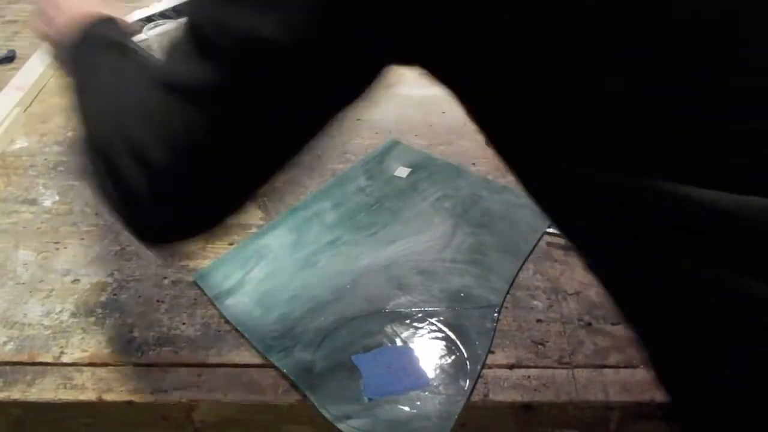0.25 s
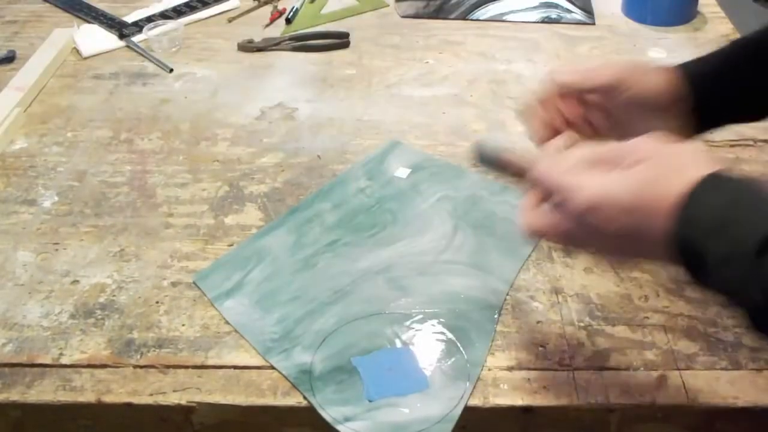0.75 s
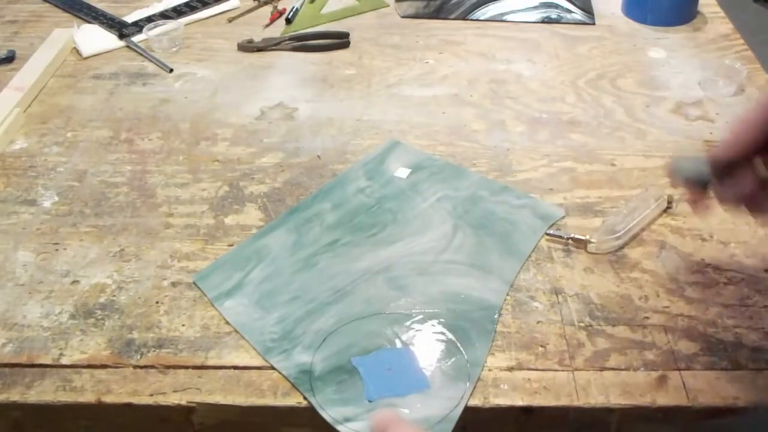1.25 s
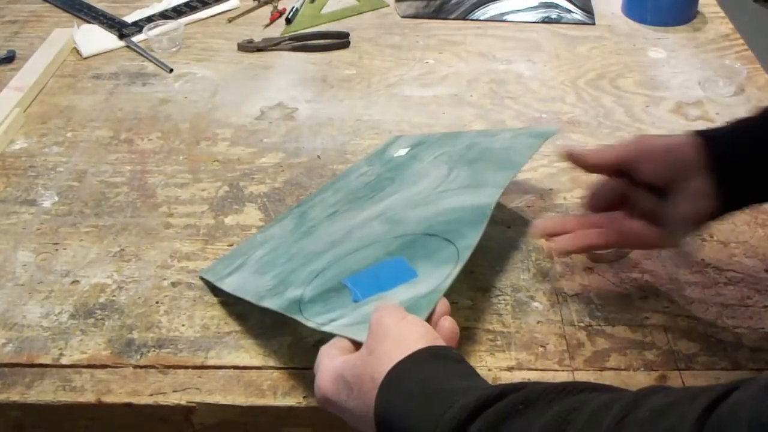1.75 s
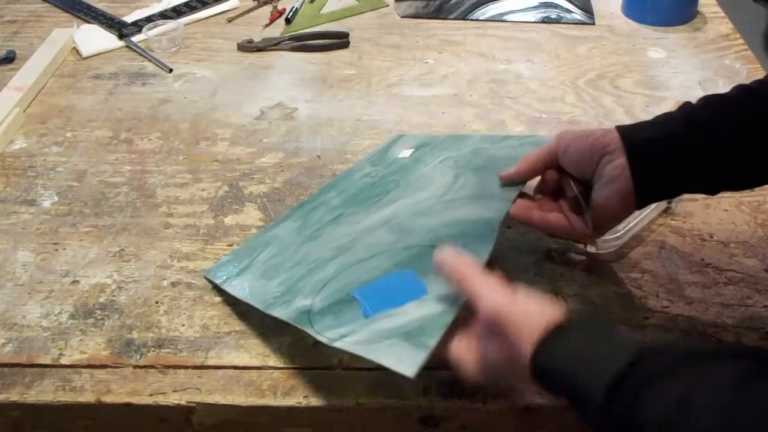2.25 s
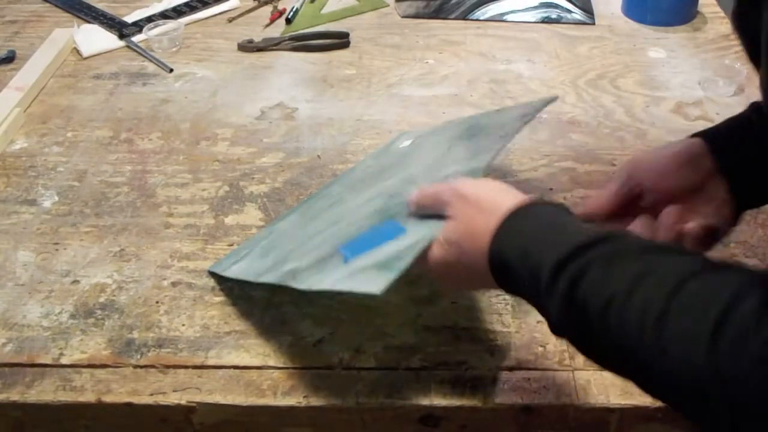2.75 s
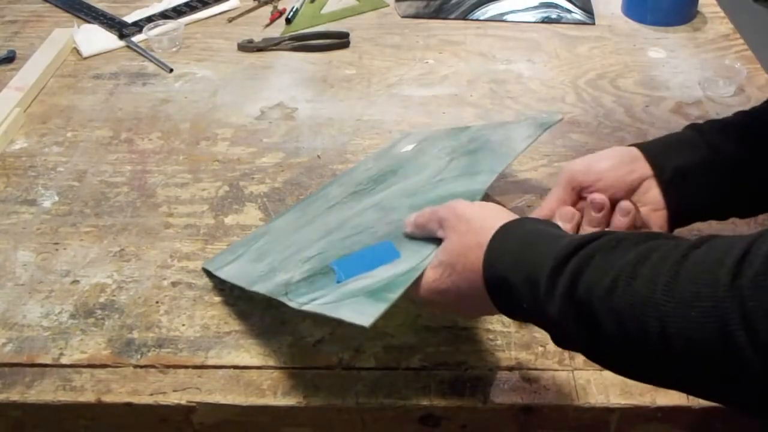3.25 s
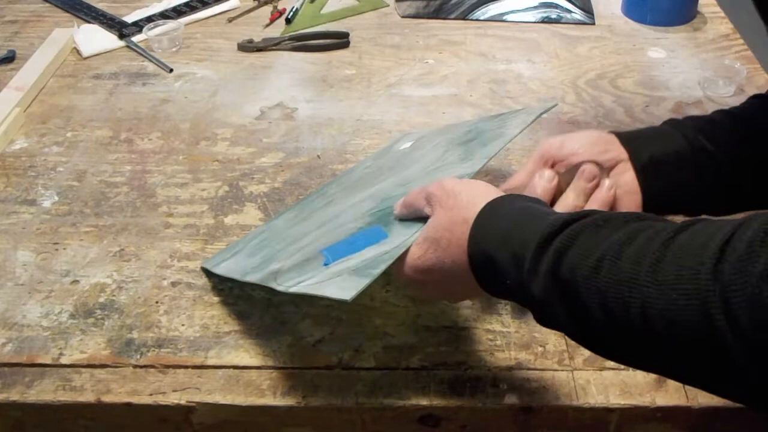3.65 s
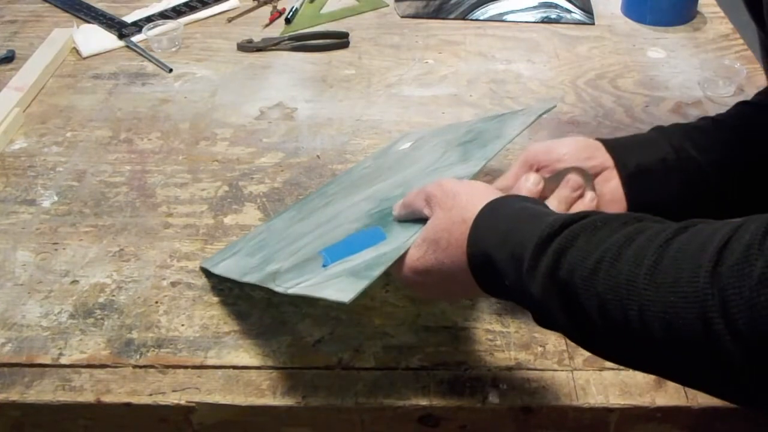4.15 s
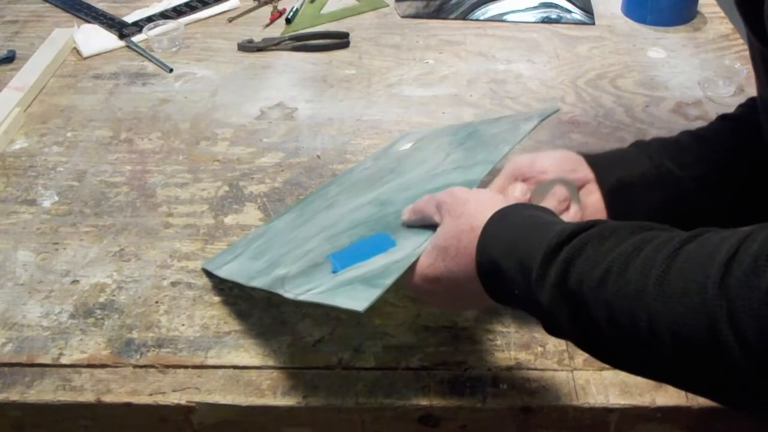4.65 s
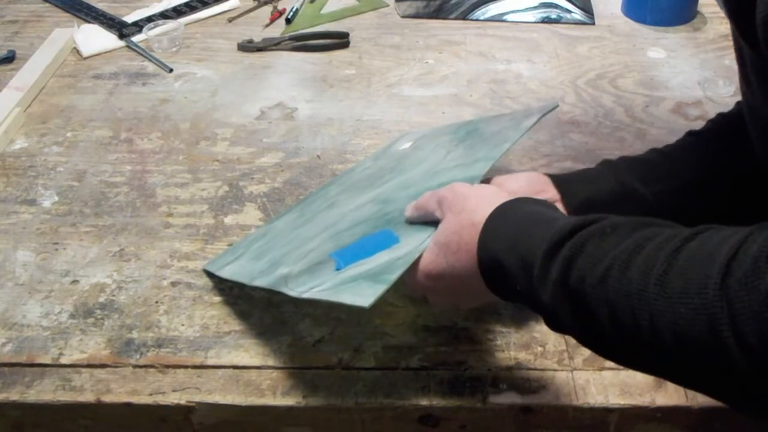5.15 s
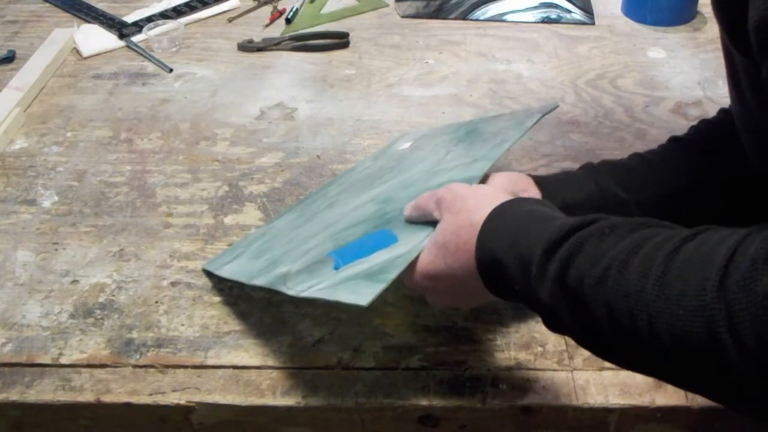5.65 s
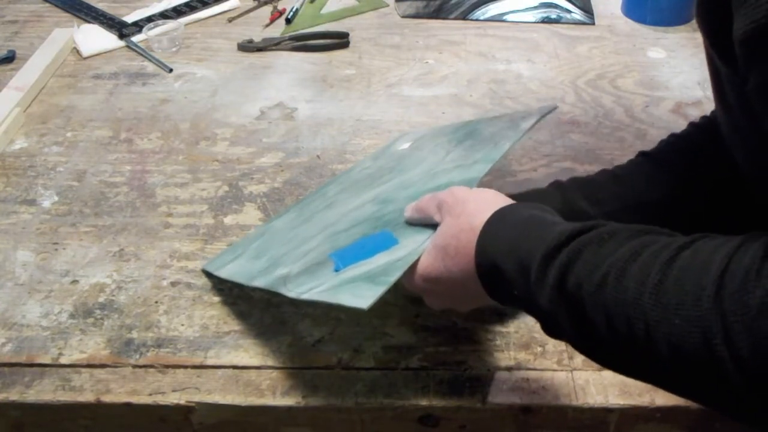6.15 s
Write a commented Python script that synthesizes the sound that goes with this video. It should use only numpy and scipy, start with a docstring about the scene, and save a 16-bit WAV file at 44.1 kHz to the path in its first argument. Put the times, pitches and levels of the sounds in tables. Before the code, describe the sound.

In a live workshop, sleeves rustle and a glass sheet clinks and scrapes on wood, then sharp metal taps crack steadily against it.

```python
"""Metal taps on a scored sheet of stained glass, about five a second: cracks, rebounds, detuned modes.
Before them the sheet is lifted on a wooden workbench: sleeves rustle (grainy noise), the cutter clicks
(damped modes), the sheet clinks (bursts plus modes), its edge drags (stick-slip ticks) and squeaks (tones).
A live workshop adds echoes and a diffuse tail, over air noise, thin crackles and a ticking buzz.
Each tap overloads the camera; its limiter ducks, then lets the room ring swell back."""
import sys
import numpy as np
from scipy import signal
from scipy.fft import rfft, irfft
from scipy.io import wavfile
from scipy.ndimage import uniform_filter1d, minimum_filter1d

SR = 44100
rng = np.random.default_rng(int(sys.argv[2]) if len(sys.argv) > 2 else 0)


def materialize(psi):
    """Save the field psi as 16-bit PCM at rate SR to the path in sys.argv[1].

    A 1-D psi becomes a single channel; in a 2-D psi each row is a channel.
    """
    bounded = np.clip(np.atleast_2d(psi).T, -1, 1)
    quanta = np.round(bounded * 32767).astype(np.int16)
    wavfile.write(sys.argv[1], SR, quanta)


N = 281799

# Table levels are relative; each source sets its own overall level.
# taps under the score: [t/s, force/dB]
TAPS = [(3.5357, -5), (3.782, -2.5), (3.996, -4), (4.199, -2.5), (4.417, -1.5), (4.6243, -1.8), (4.834, -3),
        (5.057, -7), (5.2422, -5), (5.4433, -7), (5.6433, -6), (5.851, -7), (6.057, -5.5), (6.2445, -6.5),
        (6.3728, -11)]
# sheet knocks on the bench: [t/s, level/dB, brightness/dB]
KNOCKS = [(.441, -26, -9), (1.442, -39.5, 2.5), (1.74, -33, -18), (1.969, -42, 4), (1.9898, -3, -2.5),
          (2.093, -10, -38), (2.151, -12, -27)]
# cutter clicks in the hand: [t/s, level/dB]
CLICKS = [(0.9173, -1), (0.9182, -4), (0.936, -5.5)]
# edge drags over the wood: [t/s, length/s, level/dB, brightness/dB, squeak strength/0-1]
DRAGS = [(0.445, 0.027, -10.5, 11, 0.73), (1.265, 0.069, -18.5, 5.5, 0.15), (1.44, 0.042, -19, 17.5, 0.38),
         (1.542, 0.062, -6.5, -1.5, 0.06), (2.186, 0.022, 0.5, -32, 0.5), (2.262, 0.044, 1, 3, 0.97),
         (2.328, 0.022, -3.5, 3.5, .8), (2.368, 0.061, -0.5, -5, 0), (2.426, 0.049, -3, -8, 0.5),
         (2.51, 0.03, -5.5, -8, 0.6), (2.801, 0.058, -14.5, -3, 0.08), (3.272, 0.054, -18.5, 4.5, 0.08)]
# arm movements that rustle the sleeves: [t of fastest/s, length/s, level/dB, brightness/dB]
SLEEVES = [(.01, 0.13, -55.5, -37), (0.355, 0.39, -63, 0.5), (0.614, 0.28, -57, 4), (0.824, 0.6, -59, 5.5),
           (1.58, 0.45, -59.5, 2), (1.752, 1, -66, 0.5), (2.383, 0.77, -59.5, 2), (2.918, 0.99, -66.5, 4)]
# thin crackles between the taps: [t/s, level/dB]
CRACKLES = [(3.8929, -0.5), (4.0905, -2), (4.5025, 12), (4.7005, 5), (4.9105, -4)]
# sheet modes, nominal: [f/Hz, tapped level/dB, knocked level/dB, dragged level/dB, free t60/s]
GLASS_MODES = [(555.4, -28, 0, -0.5, 0.3), (790, -7.5, -32, -29, 0.46), (884, 2, -46, -15, 0.19),
               (1090, -5.5, -51, -30, 0.31), (1191, -5, -3, -23, 0.44), (1520, 5, -45, -10, 0.21),
               (1619, -6.5, 11, -18, 0.18), (1663, 4.5, -21, -24, 0.24), (1810, -30, -17, -46, 0.077),
               (1858, -5, 9, -21, 0.13), (2033, 3, -23, -10, 0.38), (2700, -31, 22, 6, 0.12),
               (3287, 5, -32, -7, 0.23), (3377, 13.5, 16, -5, 0.07), (3357, 3.5, -38, -3, 0.13),
               (3340, 9, -41, -27, 0.031), (3670, 3, -27, -17, 0.37), (3950, 12.5, 0, -9, 0.09),
               (3820, 0, -34, -4, 0.063), (4144, -3.5, -50, -7, 0.43), (4295, 3, -34, -22, 0.23),
               (5060, -1, -10, -12, 0.28), (5389, -3.5, -46, -43, 0.37), (5450, -2, 7, -2, 0.094)]
# cutter modes: [f/Hz, level/dB, undamped t60/s]
CUTTER_MODES = [(3820, -4, 0.035), (4150, 2, 0.019), (4460, 0, 0.012), (4940, -14, 0.019), (6400, -15, .01),
                (8500, -18, .07)]
# spectrum of a tap's crack: [f/Hz, density/dB per Hz]
TAP_TONE = [(40, -22), (110, -19), (200, -18.5), (320, -16), (500, -2), (850, 2), (1700, 2.5), (3300, 4.5),
            (4200, 3.5), (5300, -2.5), (6600, -6), (7600, -13), (10000, -23.5), (15000, -58)]
# spectrum of a knock: [f/Hz, density/dB per Hz]
KNOCK_TONE = [(40, -47), (170, -39), (300, -16), (500, 11), (1100, 13.5), (1400, 8.5), (1680, 16.5),
              (2100, 15), (3300, 10.5), (5600, -2), (7400, -12), (10000, -34), (14500, -21)]
# spectrum of a drag: [f/Hz, density/dB per Hz]
DRAG_TONE = [(40, -23), (170, 0.5), (500, 1), (900, 3.5), (1800, -2), (3500, 1), (6500, -9.5), (9000, -34),
             (15000, -64)]
# spectrum of rubbing cloth: [f/Hz, density/dB per Hz]
CLOTH_TONE = [(40, -37), (170, -5), (400, -5.5), (800, 1.5), (1600, 0), (3500, -5.5), (5000, -7),
              (6800, -5.5), (9000, -21.5), (15000, -24)]
# spectrum of air and hiss: [f/Hz, density/dB per Hz]
AIR_TONE = [(30, 10), (120, -10), (250, -3.5), (500, 5.5), (900, 6), (1600, 4.5), (3300, -1.5), (4800, 4),
            (7000, -8.5), (8800, -10.5), (11000, -1), (15500, -1.5)]
# decay of the workshop: [f/Hz, t60/s]
ROOM_DECAY = [(150, 0.35), (500, 0.78), (1500, 0.71), (3500, 0.6), (6500, 0.53), (12000, 0.24)]
# nearby surfaces: [delay/s, left level/dB, right level/dB]
ECHOES = [(.0021, -27, -18.5), (.0063, -7, -11.5), (.0087, -12.5, -6), (0.0174, -5, -8)]
# left-right likeness of the room sound: [f/Hz, likeness/0-1]
LIKENESS = [(60, 0.9), (290, 0.99), (640, 0.97), (1410, 0.96), (3100, 0.88), (6800, 0.33), (15000, 0.34)]
# balance of the two microphone ports: [f/Hz, left minus right/dB]
PORT_BALANCE = [(60, 3), (130, 0.5), (290, -0.5), (640, -1), (1410, -0.5), (3100, -2.5), (6820, 0.5),
                (15000, 2.5)]
# dips in the microphone's response: [f/Hz, width/Hz, depth/dB]
NOTCHES = [(2473, 277, 23.5), (8084, 286, 14.5)]

HZ = np.fft.rfftfreq(8192, 1 / SR)
RING_T_S = np.arange(SR // 2) / SR
EDGE_HZ = 16200
BUZZ_DB, BUZZ_HZ = -43, 58.8
# first to last tap: the sheet answers fuller and brighter towards the end of the score
LOWS_START_DB, LOWS_END_DB = -7, 4.5
BRIGHT_START_DB, BRIGHT_END_DB = -1.5, 5.5
TRAVEL_POWER = 1.4
# the cutter touches the glass again after each tap; spread is log-normal
REBOUND_S, REBOUND_SPREAD, REBOUND_DB = .0032, 0.41, -13.5
CONTACT_HZ, CONTACT_SPREAD, CONTACT_T60_S = 4944, 0.045, .022
SQUEAK_HZ = 1530
SPEED_UP_SHARE = 0.68  # of a movement's length; the rest is slowing down
RESTING_DB = -78  # cloth never quite still; before the sleeve level
# gaps shrink and levels drop from bounce to bounce
BOUNCE_S, BOUNCE_SHRINK, BOUNCE_DB = .014, .8, -9


def amp(db):
    """Decibels to gain."""
    return 10 ** (np.asarray(db) / 20)


def unit(x):
    """Scales to rms 1."""
    return x / np.sqrt(np.mean(x ** 2) + 1e-20)


def read(points, hz=HZ):
    """Interpolates a table over log frequency."""
    f, value = np.transpose(points)
    return np.interp(np.log(hz + 1), np.log(f), value)


def shelf(corner_hz):
    """Weight rising from 0 below the corner to 1 above it."""
    return HZ ** 4 / (HZ ** 4 + corner_hz ** 4)


def add(mix, start_s, sound):
    """Adds a sound into the mix in place."""
    part = mix[round(start_s * SR):][:len(sound)]
    part += sound[:len(part)]


def causal(db):
    """Minimum-phase impulse response of a dB spectrum."""
    log_gain = np.log(amp(np.r_[db, db[-2:0:-1]]))
    spectrum = np.exp(np.conj(signal.hilbert(log_gain)))
    return np.fft.ifft(spectrum).real[:len(HZ)]


def colour(x, db):
    """Filters one channel by a dB spectrum."""
    return signal.oaconvolve(x, causal(db))[:len(x)]


def ring(hz, db, t60_s):
    """Sum of exponentially decaying modes set off by one blow."""
    envelopes = amp(db[:, None] - 60 * RING_T_S / t60_s[:, None])
    return (envelopes * np.sin(2 * np.pi * hz[:, None] * RING_T_S)).sum(0)


def burst(decay_s):
    """Scattered waves: a decaying noise burst of energy 1, spectrum flattened before its final fade."""
    fade = np.exp(-RING_T_S / decay_s)
    spectrum = rfft(rng.standard_normal(len(RING_T_S)) * fade)
    x = irfft(spectrum / abs(spectrum), len(RING_T_S)) * np.sqrt(fade)
    return x / np.linalg.norm(x)


def stroke_envelope(length_s):
    """Level of one edge stroke: root of a half sine."""
    return np.sqrt(np.sin(np.pi * np.minimum(RING_T_S / length_s, 1)).clip(0))


def buzz():
    """Camera electronics leak a steady train of tiny ticks, lows cut."""
    ticks = np.diff(np.floor(BUZZ_HZ * np.arange(N) / SR), prepend=0)
    return amp(BUZZ_DB) * colour(ticks, -20 * (1 - shelf(6000)))


def air(level_db=-63.0, likeness=0.31):
    """Still room air and microphone hiss: steady noise, partly shared by the two ports."""
    shared, *own = rng.standard_normal((3, N))
    noise = np.sqrt(likeness) * shared + np.sqrt(1 - likeness) * np.array(own)
    return amp(level_db) * unit(np.array([colour(side, read(AIR_TONE)) for side in noise]))


def diffuse(count):
    """Noise from all sides at two close microphones, as short-time spectra."""
    hz, t_s, (mid, side) = signal.stft(rng.standard_normal((2, count)), SR, nperseg=256)
    same = np.clip(read(LIKENESS, hz), 0, 1)[:, None]
    mid = mid * np.sqrt((1 + same) / 2)
    side = side * np.sqrt((1 - same) / 2)
    return hz, t_s, np.array([mid + side, mid - side])


def workshop(x, near, far_top_db=-5, tail_db=0.0, build_s=0.0036, near_share=0.44,
             bench_db=-6, bench_s=0.0043, drift_hz=0.3003):
    """Direct sound, near echoes, bench scatter and a tail that changes as the hands move along."""
    out = np.array([x + near, x + near])
    x = x + near_share * near  # sounds aimed at the microphone raise less of the room
    dulled = colour(x, -10 * shelf(8700))  # surfaces swallow the top
    for delay_s, *sides_db in ECHOES:
        delayed = np.pad(dulled, (round(delay_s * SR), 0))[:N]
        out += amp(sides_db)[:, None] * delayed
    for side in out:
        scatter = signal.oaconvolve(x, burst(bench_s))[:N]
        side += amp(bench_db) * colour(scatter, -14 * (1 - shelf(2730)))
    far = colour(x, far_top_db * shelf(10400))
    turn = 2 * np.pi * drift_hz * np.arange(N) / SR
    # three tails; squared weights sum to 1
    weights = (np.cos(turn), np.sin(turn) * np.cos(turn / 2), np.sin(turn) * np.sin(turn / 2))
    for weight in weights:
        hz, t_s, z = diffuse(SR)
        z = z * amp(-60 * t_s / read(ROOM_DECAY, hz)[:, None])
        tail = signal.istft(z, SR, nperseg=256)[1][:, :SR]
        tail *= 1 - np.exp(-(np.arange(SR) / SR / build_s) ** 2)
        tail /= np.linalg.norm(tail[0])
        out += amp(tail_db) * signal.fftconvolve((far * weight)[None], tail, axes=1)[:, :N]
    return out


def ports(x):
    """Bench a little to the right: port balance per frequency, mids mostly leaning right."""
    half_db = read(PORT_BALANCE) / 2
    return np.array([colour(x[0], half_db), colour(x[1], -half_db)])


def sleeves(level_db=-3, grain_db=2.5):
    """Cloth fibres catch and let go: grainy noise swelling and dying with each arm movement."""
    t_s = np.arange(N) / SR
    low_power = high_power = amp(RESTING_DB) ** 2
    for peak_s, length_s, db, bright_db in SLEEVES:
        reach_s = length_s * np.where(t_s < peak_s, SPEED_UP_SHARE, 1 - SPEED_UP_SHARE)
        rub = amp(db) * np.exp(-2 * ((t_s - peak_s) / reach_s) ** 2)
        low_power = low_power + rub ** 2
        high_power = high_power + (amp(bright_db) * rub) ** 2
    catches = amp(grain_db * unit(uniform_filter1d(rng.standard_normal(N), size=150)))
    cloth = unit(colour(rng.standard_normal(N) * catches, read(CLOTH_TONE)))
    low = signal.sosfiltfilt(signal.butter(2, 2500, fs=SR, output="sos"), cloth)
    high = cloth - low
    return amp(level_db) * (np.sqrt(low_power) * low + np.sqrt(high_power) * high)


def crackles(level_db=-13, length_s=0.00056, low_hz=9000):
    """Thin ticks above the ring of the sheet: short bursts, lows cut."""
    out = np.zeros(N)
    for start_s, db in CRACKLES:
        add(out, start_s, amp(db) * burst(length_s))
    return amp(level_db) * colour(out, -30 * (1 - shelf(low_hz)))


def cutter(level_db=-39, rattle_s=0.0024, damping=0.86):
    """The cutter's loose head clicks as it changes hands; fingers shorten its ring."""
    out = np.zeros(N)
    hz, mode_db, t60_s = np.transpose(CUTTER_MODES)
    for start_s, db in CLICKS:
        click = signal.fftconvolve(burst(rattle_s), ring(hz, mode_db, t60_s * damping))
        add(out, start_s, amp(db) * click)
    return amp(level_db) * out


def drags(level_db=-44, modes_db=-37, slips_per_s=700, damping=0.57):
    """The edge sticks and slips on the grain; random slips ring the sheet, damped by the wood."""
    out = np.zeros(N)
    hz, _, _, dragged_db, t60_s = np.transpose(GLASS_MODES)
    body = causal(read(DRAG_TONE))
    body = np.pad(body, (0, len(RING_T_S) - len(body)))
    body += amp(modes_db) * ring(hz, dragged_db, t60_s * damping)
    for start_s, length_s, db, bright_db, _ in DRAGS:
        sizes = rng.standard_normal(len(RING_T_S))
        slips = unit(sizes * (rng.random(len(RING_T_S)) < slips_per_s / SR))
        stroke = slips * stroke_envelope(length_s)
        add(out, start_s, amp(db) * colour(stroke, bright_db * shelf(2800)))
    return amp(level_db) * signal.oaconvolve(out, body)[:N]


def squeaks(level_db=-45, waver=0.025):
    """In some drags stick-slip locks briefly onto one sheet mode: a wavering tone."""
    out = np.zeros(N)
    for start_s, length_s, _, _, strength in DRAGS:
        wobble = unit(uniform_filter1d(rng.standard_normal(len(RING_T_S)), size=120))
        phase = 2 * np.pi * np.cumsum(SQUEAK_HZ * (1 + waver * wobble)) / SR
        add(out, start_s, strength * stroke_envelope(length_s) * np.sin(phase))
    return amp(level_db) * out


def knocks(level_db=-2.5, modes_db=-41, scatter_s=0.0028, count=3):
    """The sheet's edge hits the bench and bounces ever quicker and weaker; the first hit rings the modes."""
    out = np.zeros(N)
    hz, _, knocked_db, _, t60_s = np.transpose(GLASS_MODES)
    modes = amp(modes_db) * ring(hz, knocked_db, t60_s)
    for hit_s, db, bright_db in KNOCKS:
        for k in range(count):
            clink = colour(burst(scatter_s), read(KNOCK_TONE))
            if k == 0:
                clink = clink + modes
            add(out, hit_s, amp(db + k * BOUNCE_DB) * colour(clink, bright_db * shelf(1500)))
            hit_s = hit_s + BOUNCE_S * BOUNCE_SHRINK ** k
    return amp(level_db) * out


def contacts(level_db=-4):
    """The cutter's metal end rings briefly at each tap: a decaying sine, pitch varying per tap."""
    out = np.zeros(N)
    for (start_s, force_db), chance in zip(TAPS, rng.standard_normal(len(TAPS))):
        hz = CONTACT_HZ * (1 + CONTACT_SPREAD * chance)
        decay = amp(force_db - 60 * RING_T_S / CONTACT_T60_S)
        add(out, start_s, decay * np.sin(2 * np.pi * hz * RING_T_S))
    return amp(level_db) * out


def taps(level_db=22.5, modes_db=-52, grip=0.0032, snap=0.52, scatter_s=0.0059,
         scatter_spread=0.37, spot_db=2):
    """Metal on glass: a crack, a rebound, and modes whose strength depends on the spot struck."""
    out = np.zeros(N)
    hz, tapped_db, _, _, t60_s = np.transpose(GLASS_MODES)
    travel = np.linspace(0, 1, len(TAPS)) ** TRAVEL_POWER
    for (start_s, force_db), along in zip(TAPS, travel):
        low_db = LOWS_START_DB + (LOWS_END_DB - LOWS_START_DB) * along
        bright_db = BRIGHT_START_DB + (BRIGHT_END_DB - BRIGHT_START_DB) * along
        crack = burst(scatter_s * np.exp(scatter_spread * rng.standard_normal()))
        crack[0] += snap
        rebound_s = REBOUND_S * np.exp(REBOUND_SPREAD * rng.standard_normal())
        crack[round(rebound_s * SR)] += amp(REBOUND_DB)
        tap = colour(crack, read(TAP_TONE))
        held_hz = hz * (1 + grip * rng.standard_normal(len(hz)))  # shifting grip detunes the modes
        struck_db = tapped_db + spot_db * rng.standard_normal(len(hz))
        tap += amp(modes_db) * ring(held_hz, struck_db, t60_s)
        tilt_db = low_db * (1 - shelf(1200)) + bright_db * shelf(3900)
        add(out, start_s, amp(force_db) * colour(tap, tilt_db))
    return amp(level_db) * out


def scene(clink_direct=1.0, thin_db=-18, thin_hz=750):
    """Bench sounds through the workshop and ports, plus crackles, air and buzz."""
    clinks = knocks()
    sharp = colour(clinks, thin_db * (1 - shelf(thin_hz)))  # the tilted sheet beams its upper ring forward
    near = contacts() + cutter() + drags() + squeaks() + clink_direct * sharp
    bench = workshop(taps() + clinks + sleeves(), near)
    return ports(bench) + crackles() + air() + buzz()


def smooth(v, time_s):
    """One-pole smoothing."""
    pole = np.exp(-1 / (time_s * SR))
    return signal.lfilter([1 - pole], [1, -pole], v)


def limiter(x, threshold_db=-22, sense_s=0.0061, hold_s=0.0028, recover_db_per_s=180, attack_s=0.004):
    """Turns both channels down when the power jumps, holds, then recovers linearly in dB."""
    power_db = 10 * np.log10(smooth((x ** 2).mean(0), sense_s) + 1e-12)
    over_db = np.maximum(power_db - threshold_db, 0)
    half = round(hold_s * SR / 2)
    held_db = -minimum_filter1d(-over_db, 2 * half + 1, origin=half)
    fall_db = np.arange(N) * recover_db_per_s / SR
    cut_db = np.maximum.accumulate(held_db + fall_db) - fall_db
    return x * amp(-smooth(cut_db, attack_s))


def record(dry, ceiling_db=-11.0, knee=7, low_cut_hz=190, low_cut_db=22):
    """Limiter, soft overload of the peaks it lets through, bass cut, dips and band limit."""
    x = limiter(dry)
    x = x / (1 + abs(x / amp(ceiling_db)) ** knee) ** (1 / knee)
    response_db = -low_cut_db * (1 - shelf(low_cut_hz))
    for hz, width_hz, depth_db in NOTCHES:
        response_db -= depth_db * np.exp(-((HZ - hz) / width_hz) ** 2 / 2)
    x = np.array([colour(side, response_db) for side in x])
    band_limit = signal.firwin(301, EDGE_HZ, window=("kaiser", 9), fs=SR)
    return signal.oaconvolve(x, band_limit[None], "same")


dry = scene()
out = record(dry)
materialize(out)
```